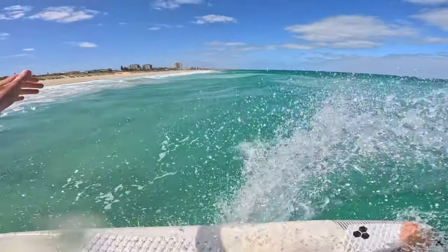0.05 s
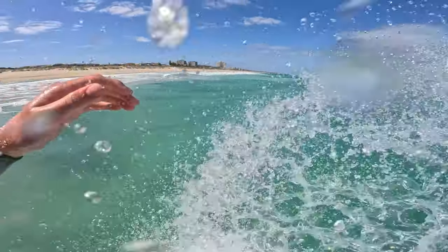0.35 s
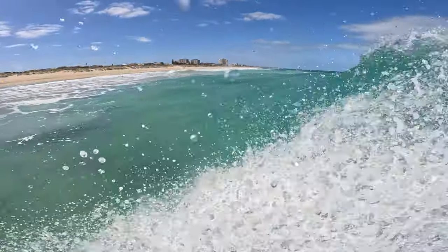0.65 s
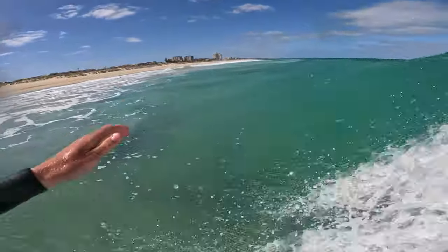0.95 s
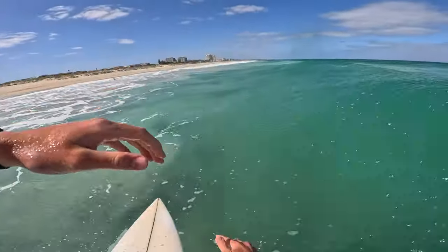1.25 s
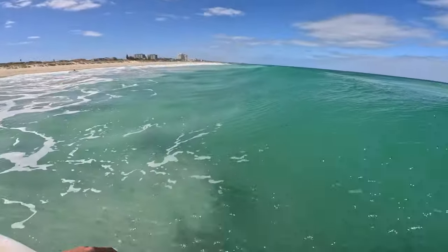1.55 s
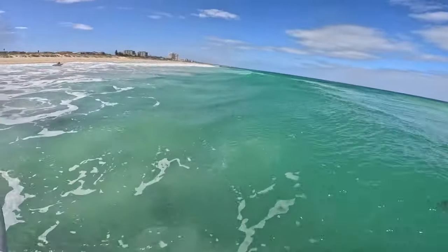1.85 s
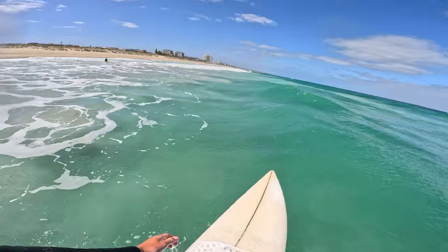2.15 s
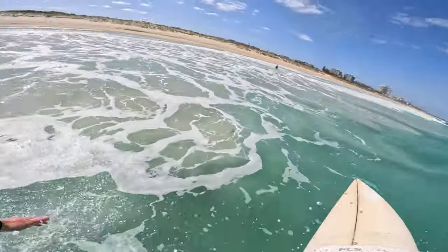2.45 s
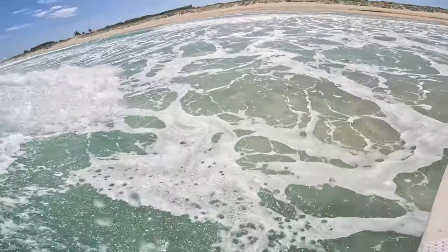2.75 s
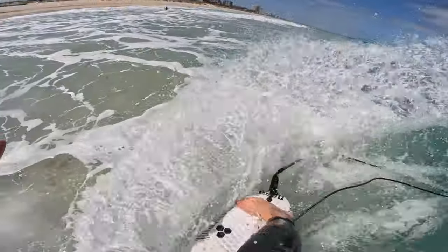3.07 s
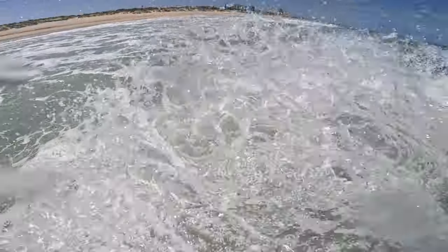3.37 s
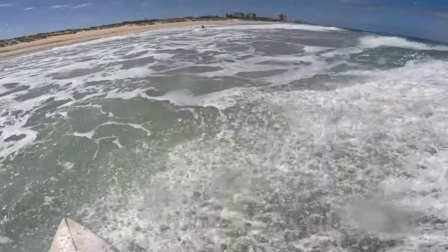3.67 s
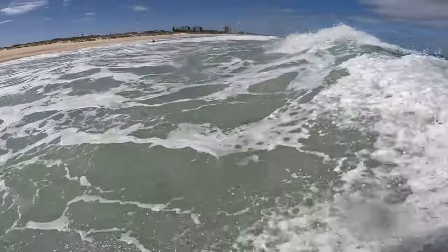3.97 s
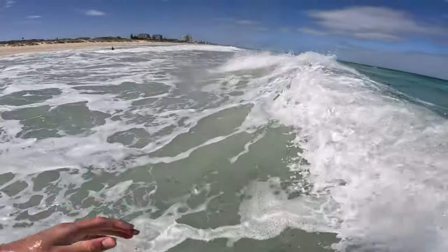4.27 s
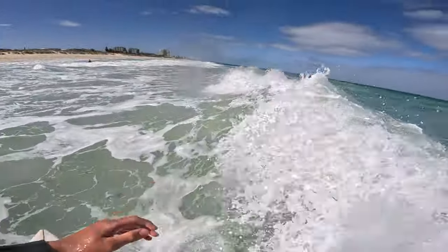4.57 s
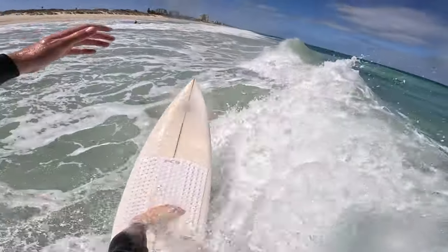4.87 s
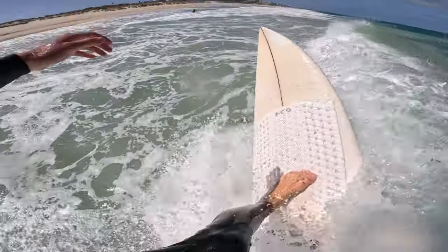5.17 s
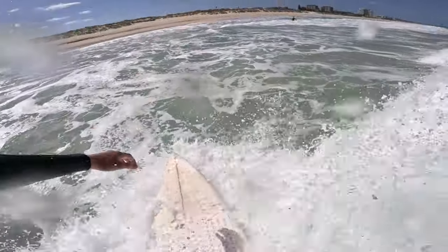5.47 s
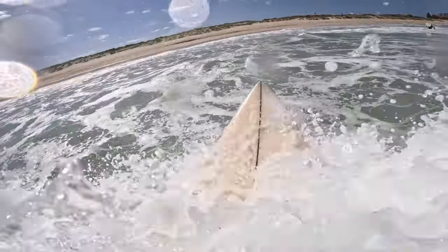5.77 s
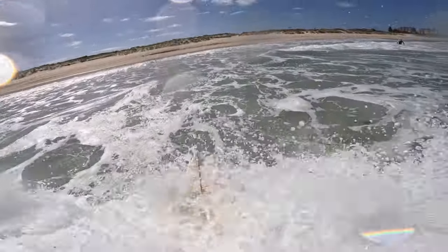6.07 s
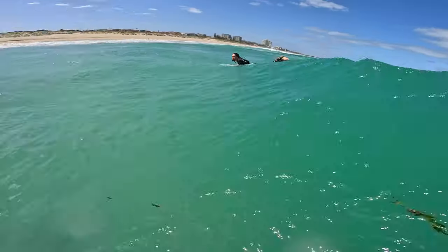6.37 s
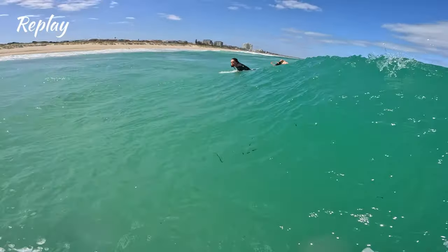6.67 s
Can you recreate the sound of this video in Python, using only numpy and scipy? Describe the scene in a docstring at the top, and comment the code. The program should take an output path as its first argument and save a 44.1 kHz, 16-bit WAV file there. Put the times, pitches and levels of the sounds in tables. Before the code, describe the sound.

Close, rushing whitewater and low, fluttering wind surround a waterproof camera carried along a wave. It opens with spattering spray and several sharp, hollow water hits, then settles into a quieter stretch of fizz and wind. Two louder spells of churning foam follow, with water gurgling over the housing and bumping the microphone. After a sudden tiny break, the last half second of surf and wind plays deeper, in slow motion.

```python
"""On a breaking wave, at the two microphone ports of a small waterproof camera carried by a surfer.
Whitewater hisses as foam bursts and spray falls. Splashes and running water drive the resonances of
the wet housing, and turbulent wind buffets both ports. The hardest impacts make the gain control duck
and swell back. In the last half second, water and wind run in slow motion, lower in pitch."""
import sys
import numpy as np
from scipy import signal
from scipy.fft import rfft, irfft, next_fast_len
from scipy.io import wavfile
from scipy.ndimage import uniform_filter1d, minimum_filter1d, map_coordinates

SR = 44100
rng = np.random.default_rng(int(sys.argv[2]) if len(sys.argv) > 2 else 0)


def transcribe(u):
    """Save the signal u as a 16-bit wav file named by the first command-line argument.

    u: samples, shape (n,) or (channels, n), limited to [-1, 1]; the rate is SR.
    q: integer samples, one column per channel.
    """
    v = np.clip(np.atleast_2d(u).T, -1, 1)
    q = np.round(v * 32767).astype(np.int16)
    wavfile.write(sys.argv[1], SR, q)


N = 305172
TIME = np.arange(N) / SR
SLOW_FROM_S, SLOW_SPEED = 6.404, 0.61


# Whitewater around the board, quietest on the unbroken face of the wave: [time_s, level_db]
FOAM_LEVEL = [(0.0, -17), (0.35, -22), (0.65, -26.5), (0.95, -25.5), (1.06, -24), (1.12, -29), (1.24, -35),
              (1.36, -30), (1.5, -31), (1.68, -29.5), (1.76, -26), (1.88, -25), (1.94, -27.5),
              (2.08, -24.5), (2.23, -32), (2.38, -31.5), (2.44, -25.5), (2.68, -24), (2.8, -28.5),
              (3.05, -21.5), (3.4, -19.5), (3.65, -19), (3.85, -22.5), (3.97, -24), (4.1, -26.5),
              (4.75, -22.5), (4.97, -30), (5.32, -22), (5.6, -19.5), (5.95, -28), (6.11, -29.5),
              (6.2, -36.5), (6.38, -25), (6.44, -22), (6.63, -24), (6.69, -27), (6.78, -23), (6.92, -18.5)]
# Deep churn relative to the fizz, heaviest in the bottom turn: [time_s, level_db]
CHURN_LEVEL = [(0.0, -4), (0.2, -1), (1.08, -2.5), (1.45, 3.5), (1.85, -1), (2.27, 10), (2.45, -1.5),
               (2.9, -1.5), (3.9, -2), (4.3, 4.5), (5.2, -2), (5.7, 2.5), (6.92, 1)]
# Foam spectra through the wet left port and the clear right port: [frequency_hz, gain_db]
FOAM_SPECTRUM_LEFT = [(60, -4.5), (170, 9.5), (330, 1), (520, -3.5), (690, 9.5), (1000, 3), (1500, -5),
                      (2000, -7.5), (2600, -7), (3200, -2.5), (3900, -7), (4350, -13), (4750, -34.5),
                      (5500, -80)]
FOAM_SPECTRUM_RIGHT = [(150, 6), (500, 0.5), (800, -6.5), (1050, -2.5), (1900, -8), (2600, -4.5), (3200, 0),
                       (3850, 3), (4900, -8), (6400, -13.5), (7400, -24), (8800, -48), (12200, -50.5),
                       (14500, -77)]
def whitewater(left_db=1.0, right_db=3.0, spray_db=-6, flicker_db=1.55, surge_db=1.5, split_hz=2100):
    """Incoherent sources: bursting foam and spray sum to noise whose churn and fizz surge separately."""
    foam = rng.standard_normal(N) + undb(spray_db) * drops(per_s=3000, spread_db=6.5) + spurts()
    # filtering forwards and backwards cancels the phase shift, so the rest is pure fizz
    churn = lowpass(lowpass(foam, split_hz, order=2)[::-1], split_hz, order=2)[::-1]
    fizz = foam - churn
    bands = [(churn, curve(CHURN_LEVEL) + surge_db * drift(25)), (fizz, flicker_db * drift(40))]
    left = right = 0
    for band, db in bands:  # both ports hear the same water, the right a quarter cycle later
        left += slow_motion(colour(band, FOAM_SPECTRUM_LEFT)) * undb(db + left_db)
        right += slow_motion(colour(band, FOAM_SPECTRUM_RIGHT, phasor=-1j)) * undb(db + right_db)
    return np.array([left, right]) * undb(curve(FOAM_LEVEL)) / np.std(colour(foam, FOAM_SPECTRUM_RIGHT))


# Handfuls of spray landing close by, relative to the foam: [centre_s, level_db, half_width_s]
SPRAY_SPURTS = [(0.058, 10, 0.0079), (0.143, 7, 0.016), (0.193, 0.5, 0.012), (0.445, 7.5, 0.019),
                (1.1, 3, 0.014), (1.347, 1, 0.016), (1.718, 5, 0.0064), (1.774, 3, 0.0092),
                (1.893, 11.5, 0.007), (2.026, -1, .01), (2.12, 0, 0.011), (2.245, 5.5, 0.015),
                (2.406, 8, 0.0085), (2.479, 3.5, 0.0059), (2.612, 4, 0.01), (2.716, 14, 0.0036),
                (2.929, 7.5, 0.016), (3.052, 9, 0.017), (3.179, 4, 0.013), (3.304, 10.5, 0.0073),
                (3.344, 9.5, 0.015), (3.414, 4, 0.014), (3.679, 9.5, 0.0029), (3.924, 2.5, 0.02),
                (5.037, 2, 0.011), (5.096, 4, 0.018), (5.181, 5, 0.0057), (5.207, 4, 0.0087),
                (5.303, 2, 0.0077), (5.393, -1.5, 0.0087), (5.605, -4.5, 0.0089), (5.839, 9, 0.014),
                (6.532, -3.5, 0.0053), (6.618, -1.5, 0.0079), (6.655, 7.5, 0.0054)]
def spurts(patter_hz=3000):
    """Shot noise: each handful is a brief Gaussian cloud of fat drops, duller than the foam."""
    heard_s = TIME + np.maximum(TIME - SLOW_FROM_S, 0) * (1 / SLOW_SPEED - 1)  # time once slowed
    clouds = sum(undb(db) * np.exp(-((heard_s - centre_s) / half_width_s) ** 2)
                 for centre_s, db, half_width_s in SPRAY_SPURTS)
    return clouds * lowpass(drops(per_s=2300, spread_db=0), patter_hz, order=1)


# Lumps of water striking the housing: [start_s, knock_db, low_hz, high_hz, thud_over_knock_db]
SPLASH_IMPACTS = [(0.151, -4.5, 120, 398, -11.5), (0.215, 1, 50.5, 300, -10), (0.303, 21.5, 380, 885, 0),
                  (0.337, 1.5, 517, 800, -23), (0.4559, 28.5, 507, 874, -20.5), (0.5530, 3, 34.1, 349, -10),
                  (.6000, 8.5, 86, 630, -30), (0.6797, 9, 79.3, 620, -25), (0.7116, -0.5, 56, 410, -19),
                  (0.7529, 41.5, 558, 773, -18.5), (0.89, 16, 46.7, 567, -28.5),
                  (1.2365, -6, 121, 820, -14), (1.24, -14.5, 60, 497, -6), (1.922, -12.5, 29.9, 133, -7),
                  (2.704, -1, 199, 850, -5), (3.539, 13.5, 44.6, 656.8, -22.5), (3.6451, 4, 152, 920, -13),
                  (3.6818, 28.5, 340, 1500, -5), (5.058, -3, 250, 900, -11.5),
                  (5.085, -13, 299.9, 900, -16), (5.448, -4.5, 118, 710, -2), (5.715, 2.5, 250, 860, -9),
                  (6.1255, 24.5, 281, 1330, -9)]
def splashes(dispersion_hz=1500, thud_low_hz=62, thud_high_hz=536, thud_lag_s=0.0017, size=4096):
    """Impulse response: a short push rings the housing, a long one thumps it; its weight adds a thud."""
    out = np.zeros(N + size)
    impulse = signal.unit_impulse(size)
    # an all-pass filter delays the lows, so each knock falls in pitch
    pole = np.exp(-2 * np.pi * dispersion_hz / SR)
    ringing = signal.lfilter([-pole, 1], [1, -pole], housing_ring(impulse))
    # the water's weight presses straight on the port
    pressure = lowpass(np.roll(impulse, int(thud_lag_s * SR)), thud_high_hz, order=4)
    thud = highpass(pressure, thud_low_hz)
    thud /= np.abs(thud).max()
    for start_s, knock_db, low_hz, high_hz, thud_db in SPLASH_IMPACTS:
        knock = highpass(lowpass(ringing, high_hz, order=4), low_hz)
        knock /= np.abs(knock).max()
        start = int(start_s * SR)
        out[start:start + size] -= undb(knock_db) * (knock + undb(thud_db) * thud)
    return out[:N]


# Resonances of the wet housing: [frequency_hz, bandwidth_hz, gain_db]
HOUSING_MODES = [(145.8, 58, 1.5), (302, 181, -2.5), (674, 172, 3.5), (910, 3400, -19.5)]
def housing_ring(force):
    """Modal superposition: a force excites damped resonances, neighbours in opposite polarity."""
    return sum((-1) ** k * undb(db) * signal.lfilter(*signal.iirpeak(hz, hz / width_hz, fs=SR), force)
               for k, (hz, width_hz, db) in enumerate(HOUSING_MODES))


# Sheets of water washing over the housing and loading its ring: [start_s, length_s, level_db, pitch_hz]
WATER_SHEETS = [(0.0, 0.2, -32.5, 728.7), (0.2, 0.11, -19, 708.6), (0.282, .022, -17, 740.3),
                (0.328, 0.12, -23, 690.1), (0.719, 0.033, -22, 700.1), (1.161, 0.14, -27, 680),
                (2.653, 0.215, -14, 696.4), (2.902, 0.08, -18.5, 709.8), (3.188, 0.41, -18, 679.5),
                (4.819, 0.16, -15, 689), (5.042, 0.16, -21.5, 670.9), (5.415, 0.13, -17.5, 658.8),
                (5.698, 0.069, -24.5, 680.5), (5.807, 0.33, -13, 716), (6.15, 0.13, -24.5, 679.7)]
def sheets():
    """Build-up and decay: each sheet of water rises, holds and drains away; one envelope a row."""
    return np.array([undb(db) * swell(start_s, length_s, attack_s=0.022, release_s=0.01806)
                     for start_s, length_s, db, _ in WATER_SHEETS])


def drumming(flow, force_hz=785, stream_db=2, gain_db=3.5, wander=0.0298):
    """Mass loading: drops and running water ring the housing, and the water on it shifts the pitch."""
    force = drops(per_s=1000, spread_db=2.5) + undb(stream_db) * rng.standard_normal(N)
    ringing = unit_rms(housing_ring(lowpass(force, force_hz, order=6)))
    weights = sheets() + 1e-9
    loaded_hz = np.array(WATER_SHEETS)[:, 3] @ weights / weights.sum(axis=0)
    main_mode_hz = HOUSING_MODES[2][0]
    pitch_ratio = loaded_hz / main_mode_hz * (1 + wander * drift(18))
    return slow_motion(ringing, pitch_ratio) * flow * undb(gain_db)


def slosh(flow, band_hz=(200, 420), gain_db=-6):
    """Band-limited shot noise: heavy lumps in the flow pummel the port, below the housing's main ring."""
    band = signal.butter(2, band_hz, "band", fs=SR, output="sos")
    lumps = signal.sosfilt(band, drops(per_s=260, spread_db=0))
    return slow_motion(unit_rms(lumps)) * flow * undb(gain_db)


# Pressure spectrum of turbulence on a port: [frequency_hz, level_db]
EDDY_SPECTRUM = [(12, -8), (30, 0.5), (85, -1.5), (130, -8.5), (220, -14.5), (450, -27), (1000, -39),
                 (3000, -100.5)]
def wind(flutter_db=2.5, gain_db=2.5, shared_db=-4):
    """Partial coherence: most eddies press on one port alone, while some cover both."""
    shared = undb(shared_db) * rng.standard_normal(N)
    ports = []
    for strength in turbulence():
        eddies = colour(rng.standard_normal(N) + shared, EDDY_SPECTRUM) * undb(flutter_db * drift(24))
        ports.append(slow_motion(unit_rms(eddies)) * strength)
    return np.array(ports) * undb(gain_db)


# Headwind on the exposed right port: [time_s, level_db]
HEADWIND_LEVEL = [(0.0, -10.5), (0.3, -20.5), (1.03, -42.5), (1.25, -25.5), (1.7, -23), (2.15, -21),
                  (2.5, -21), (2.7, -24.5), (3.1, -20), (3.55, -15.5), (3.97, -38.5), (4.27, -21.5),
                  (4.7, -19.5), (5.6, -17.5), (6.55, -27), (6.92, -26)]
# Gusts swirling round the housing: [start_s, length_s, left_db, right_db]
WIND_GUSTS = [(0.178, 0.38, -16, -23), (0.447, 0.053, -0.5, -3), (0.575, 0.42, -16.5, -21),
              (0.768, 0.22, -21, -17.5), (1.129, 0.17, -19, -24), (1.844, 0.1, -27, -23),
              (2.188, 0.065, -26, -19.5), (2.688, 0.42, -13, -34), (3.422, 0.45, -13.5, -17),
              (3.745, 0.12, -27, -21), (3.96, 0.3, -28.5, -29), (4.906, 0.3, -31, -26),
              (5.4, 0.35, -16, -26), (5.83, 0.36, -19, -24), (6.117, 0.16, -16.5, -16),
              (6.716, 0.26, -26, -19.5)]
def turbulence(lee_db=-16, wash_left_db=-3.5, wash_right_db=-10.5):
    """Power addition: headwind, gusts and washes stir independent eddies at the left and right port."""
    headwind = undb(curve(HEADWIND_LEVEL) + np.array([[lee_db], [0]]))
    gusts = 0
    for start_s, length_s, left_db, right_db in WIND_GUSTS:
        envelope = swell(start_s, length_s, attack_s=0.021, release_s=0.042, sag_db_per_s=23.5)
        gusts += undb([[left_db], [right_db]]) * envelope
    stirred = undb([[wash_left_db], [wash_right_db]]) * sheets().sum(axis=0)
    return np.sqrt(headwind ** 2 + gusts ** 2 + stirred ** 2)


def shudder(force_hz=430, flutter_db=1.0, gain_db=-2.5):
    """Forced vibration: the headwind's soft push excites mostly the low modes of the housing."""
    force = rng.standard_normal(N) * undb(flutter_db * drift(30))
    ringing = unit_rms(housing_ring(lowpass(force, force_hz, order=2)))
    return slow_motion(ringing) * undb(curve(HEADWIND_LEVEL) + gain_db)


# Spectrum of a faint, thin hiss: [frequency_hz, level_db]
THIN_HISS_SPECTRUM = [(3500, -28), (5000, 10), (7300, 15), (8200, -20), (10000, -43)]
def thin_hiss(level_db=-74):
    """Filtered noise: a faint band of treble lies over the slow motion."""
    hiss = unit_rms(colour(rng.standard_normal(N), THIN_HISS_SPECTRUM))
    return (TIME > SLOW_FROM_S) * hiss * undb(level_db)


def drops(per_s, spread_db):
    """Poisson process: impacts at random times; a spread makes a few larger than the rest."""
    hits = rng.random(N) < per_s / SR
    signs = rng.choice([-1, 1], N)
    sizes = undb(spread_db * np.minimum(rng.exponential(size=N), 4))
    return unit_rms(hits * signs * sizes)


def swell(start_s, length_s, attack_s, release_s, sag_db_per_s=0):
    """Envelope of passing air or water: linear rise, hold or sag, exponential decay."""
    age_s = TIME - start_s
    rise = np.clip(age_s / attack_s, 0, 1)
    held = undb(-sag_db_per_s * np.clip(age_s, 0, length_s))
    return rise * held * np.exp(-np.maximum(age_s - length_s, 0) / release_s)


def drift(rate_hz):
    """Random modulation: smoothed steps with an rms of one."""
    hold = int(SR / rate_hz)
    steps = np.repeat(rng.standard_normal(N // hold + 1), hold)
    return unit_rms(uniform_filter1d(steps, hold)[:N])


def slow_motion(x, pitch_ratio=1):
    """Time scaling: frequencies fall with the speed from SLOW_FROM_S on; pitch_ratio bends them too."""
    speed = np.where(TIME < SLOW_FROM_S, 1, SLOW_SPEED) * pitch_ratio
    return map_coordinates(x, [np.cumsum(speed) - 1], order=3, mode="mirror")


def colour(x, spectrum, phasor=1):
    """Spectral shaping: each frequency takes its own gain, and the phasor turns all phases alike."""
    size = next_fast_len(len(x), True)
    hz, db = np.transpose(spectrum)
    bins_hz = np.maximum(np.arange(size // 2 + 1) * SR / size, 1)
    gain = undb(np.interp(np.log(bins_hz), np.log(hz), db))
    return irfft(rfft(x, size) * gain * phasor, size)[:len(x)]


def lowpass(x, hz, order):
    """Low-pass filtering: a push becomes softer and longer."""
    return signal.sosfilt(signal.butter(order, hz, fs=SR, output="sos"), x)


def highpass(x, hz):
    """High-pass filtering: a push loses its slowest part."""
    return signal.sosfilt(signal.butter(2, hz, "high", fs=SR, output="sos"), x)


def curve(table):
    """Linear interpolation of a level over time."""
    return np.interp(TIME, *np.transpose(table))


def undb(db):
    """Decibels to amplitude ratio."""
    return 10 ** (np.asarray(db) / 20)


def unit_rms(x):
    """Normalisation to an rms of one."""
    return x / np.sqrt(np.mean(x ** 2))


# Transmission of the housing's sound to the right port: [frequency_hz, gain_db]
HOUSING_TO_RIGHT = [(100, -2), (350, -12), (600, -11), (720, -13.5), (900, -25), (2000, -13.5)]
def scene(lead_s=0.00033, break_s=0.00081, fade_s=0.017, flutter_db=2.0, half_power_flow_db=-10):
    """Superposition at two ports: the housing sounds mostly left, and duller and sooner on the right."""
    flow = sheets().sum(axis=0) * undb(flutter_db * drift(40))  # water runs over in uneven surges
    housing = drumming(flow) + slosh(flow) + shudder() + splashes()
    housing_right = colour(np.interp(TIME + lead_s, TIME, housing), HOUSING_TO_RIGHT)
    # the whitewater hiss dips during each surge of water
    hiss_dip = 1 / np.hypot(1, flow / undb(half_power_flow_db))
    # the sound drops out for a moment as the slow motion begins, then fades in
    fade = np.clip(np.maximum((SLOW_FROM_S - TIME) / break_s, (TIME - SLOW_FROM_S) / fade_s), 0, 1)
    return fade * (thin_hiss() + hiss_dip * whitewater() + wind() + np.array([housing, housing_right]))


def gain_control(x, threshold_db=-10.0, ratio=3.52, release_db_per_s=108, ahead_s=0.00072):
    """Look-ahead compression: the gain ducks just before a peak and recovers at a steady rate."""
    peak_db = 20 * np.log10(np.abs(x).max(axis=0) + 1e-9)
    over_db = np.maximum(peak_db - threshold_db, 0)
    recovery_db = release_db_per_s * TIME
    duck_db = np.maximum.accumulate(over_db * (1 - 1 / ratio) + recovery_db) - recovery_db
    window = 2 * int(ahead_s * SR) + 1
    return x * undb(uniform_filter1d(minimum_filter1d(-duck_db, window), window))


def record(dry, knee=22.0, ceiling=0.95, top_hz=15000):
    """Saturation: peaks that overshoot the gain control are rounded off, then the top treble is cut."""
    ducked = gain_control(dry)
    clipped = ducked / (1 + np.abs(ducked / ceiling) ** knee) ** (1 / knee)
    return signal.sosfilt(signal.ellip(8, .2, 70, top_hz, fs=SR, output="sos"), clipped)


dry = scene()
out = record(dry)
transcribe(out)
```